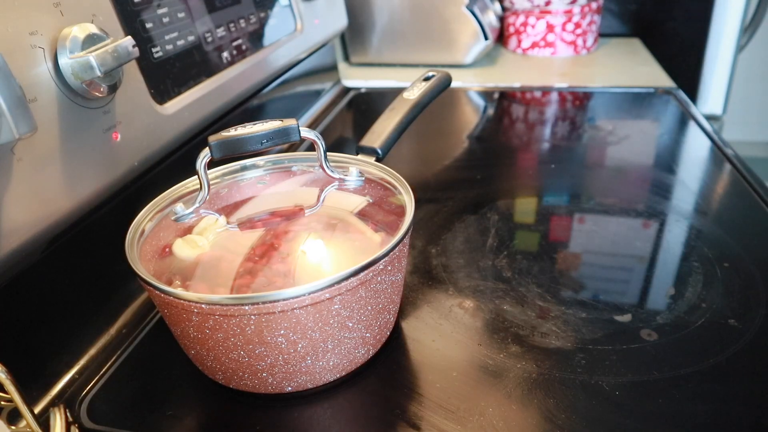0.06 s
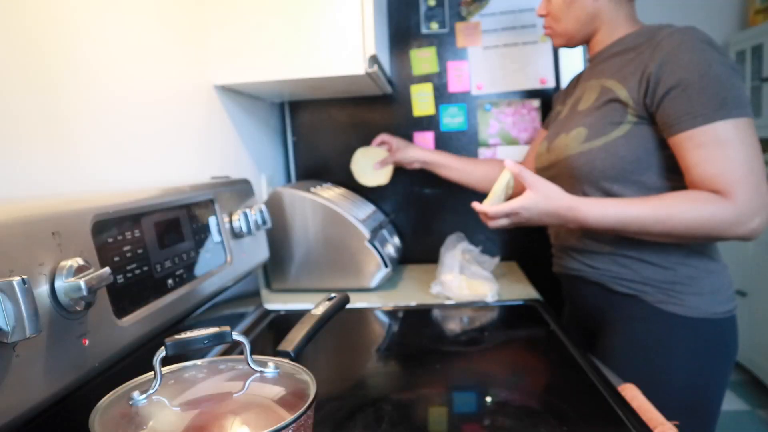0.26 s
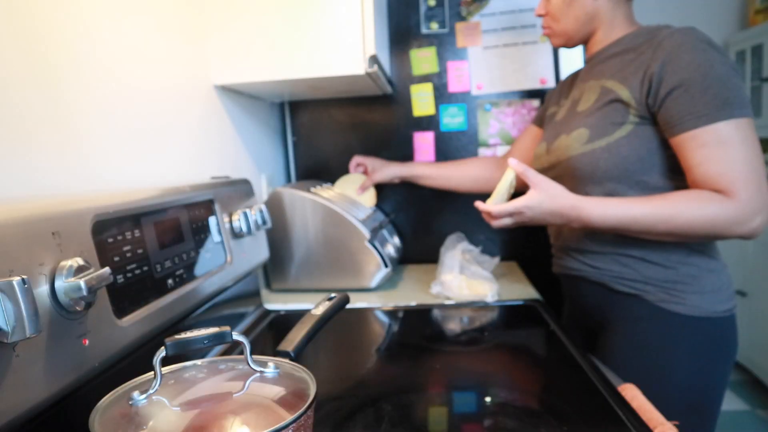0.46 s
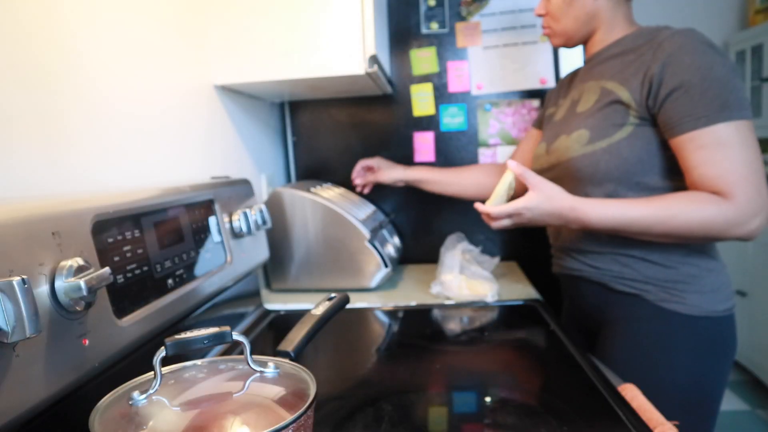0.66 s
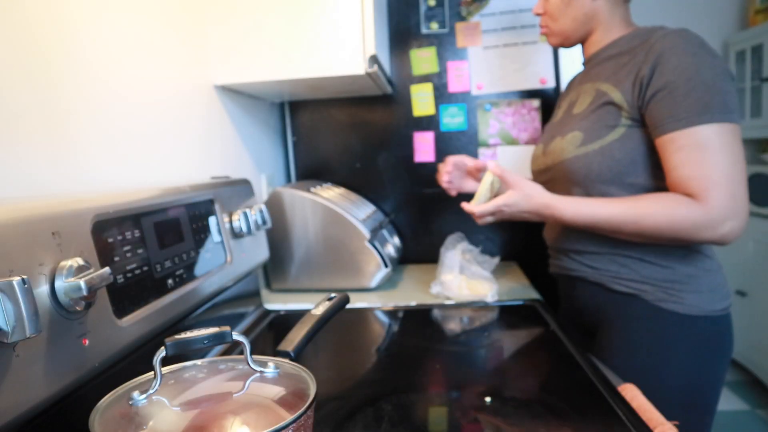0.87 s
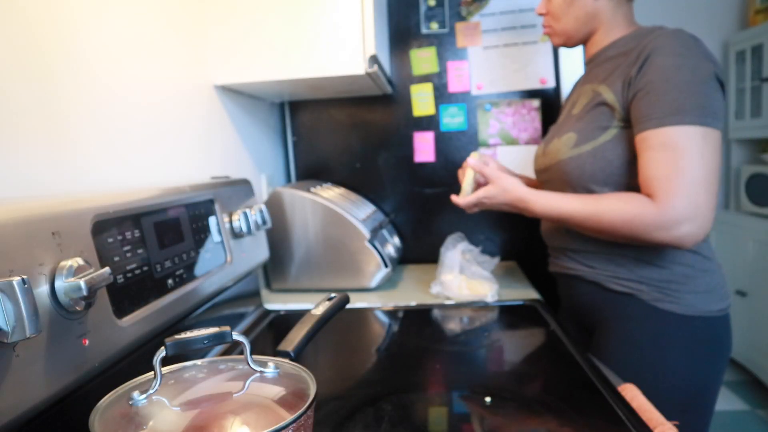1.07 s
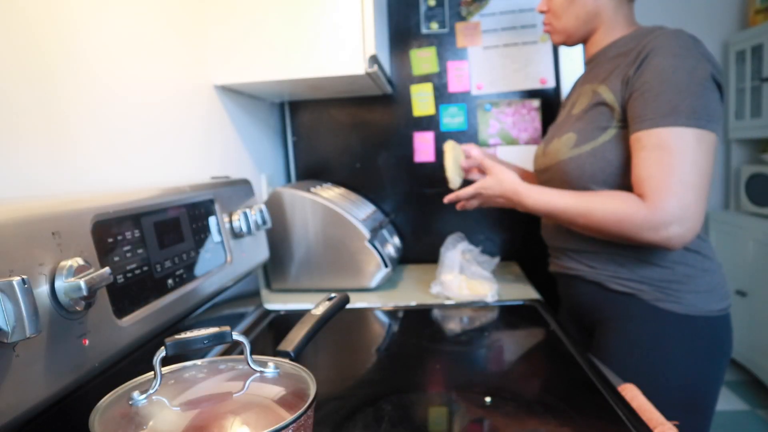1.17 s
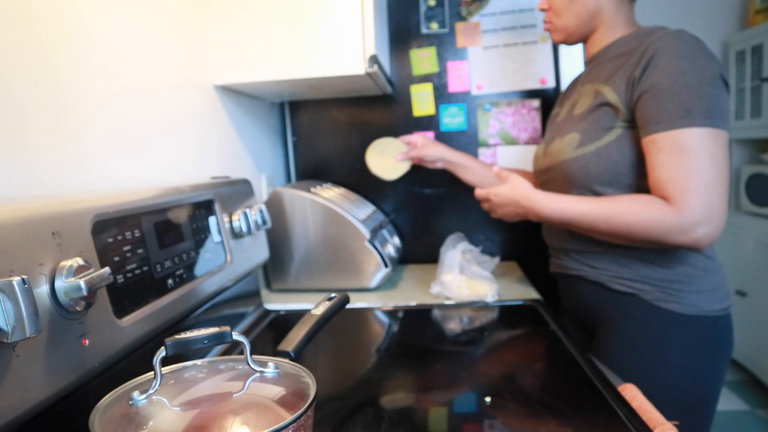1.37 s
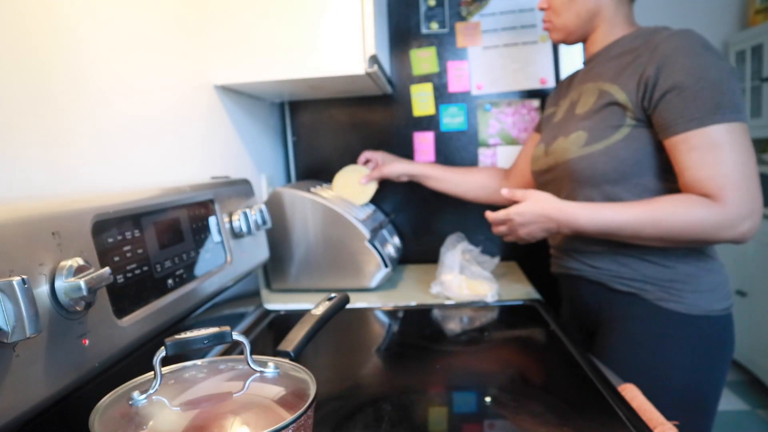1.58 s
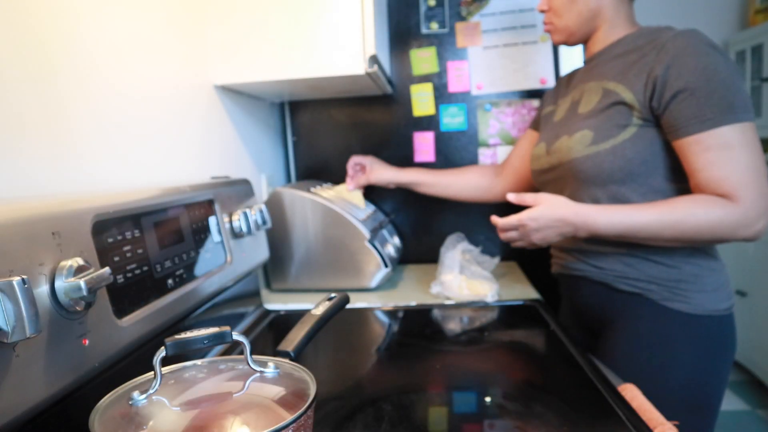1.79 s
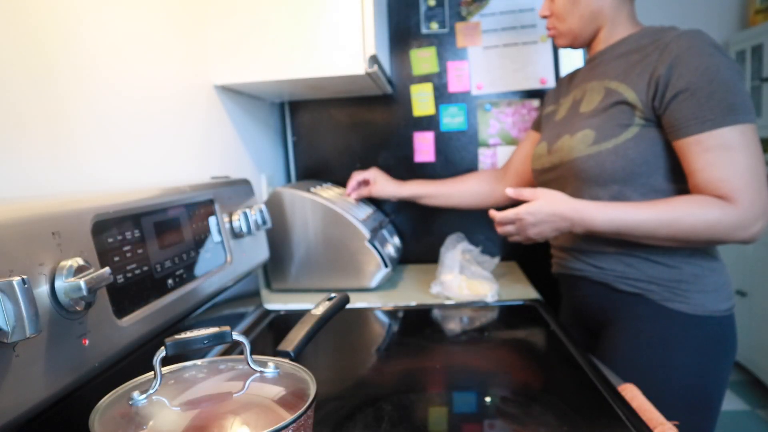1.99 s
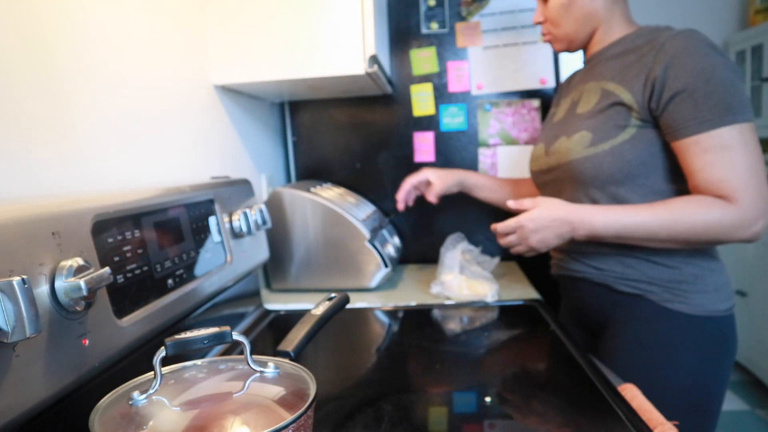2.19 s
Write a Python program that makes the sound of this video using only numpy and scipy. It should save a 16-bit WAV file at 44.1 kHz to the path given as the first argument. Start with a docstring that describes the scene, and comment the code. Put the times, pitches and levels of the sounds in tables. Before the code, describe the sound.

Bread is put into a steel toaster in a quiet kitchen. Silence until 0.16 s, then a steady faint low hum with airy room noise. Tiny pot ticks and a very thin, brief high whine come and go. At 0.6-0.8 s a slice scrapes softly down. Light knocks from 1.78 s lead to a sharp metallic clack at 1.89 s, with thud, short ring and room echo, then small slides until about 2.17 s.

```python
"""A quiet kitchen, heard from the stove after a moment of silence: a steady appliance hum made of
narrow noise bands over broad room noise. A covered pot ticks faintly (short noise bursts) and a thin
whine comes and goes (wavering sine). One piece of bread scrapes down into a steel toaster's slot (grainy
noise). A second knocks in with a sharp clack (noise bursts), rings the shell and wire carriage
(fading sines), then slides and settles. Hard walls answer with a fading noise echo."""
import sys
import numpy as np
from scipy import signal
from scipy.fft import rfft, irfft, next_fast_len
from scipy.io import wavfile

SR = 44100
rng = np.random.default_rng(int(sys.argv[2]) if len(sys.argv) > 2 else 0)


def master_out(mix):
    """Clip the mix to full scale and print it as 16-bit PCM to the path in sys.argv[1]."""
    frames = np.transpose(np.atleast_2d(mix))
    ceiling = np.clip(frames, -1, 1)
    pcm = np.round(ceiling * 32767).astype(np.int16)
    wavfile.write(sys.argv[1], SR, pcm)


N = 98916

# how alike left and right are for nearby sounds and their echo:
# (frequency [Hz], likeness [1 same, 0 unrelated, -1 opposite])
NEAR_ALIKE = [(70, 1), (200, 1), (700, 0.98), (1500, 0.89), (2800, 0.86), (4500, 0.18), (8000, -0.26),
              (12000, -0.24)]
CONTACT_ATTACK_S = 0.00053  # time constant of the rise, for knocks and ticks alike


def amp(db):
    """Turn decibels into a gain."""
    return 10 ** (np.asarray(db) / 20)


def unit(x):
    """Scale to an average strength (rms) of 1."""
    return x / np.sqrt(np.mean(x ** 2) + 1e-20)


def along(points, hz):
    """Read a curve of (frequency, value) points, joined up on a logarithmic frequency axis."""
    point_hz, values = np.transpose(points)
    return np.interp(np.log(hz + 1), np.log(point_hz + 1), values)


def resonance(f, hz, width):
    """A peak of height 1 at hz; it is half as high at half the width to either side."""
    return 1 / (1 + (2 * (f - hz) / width) ** 2)


def filtered(x, response):
    """Multiply the spectrum of x by a gain that depends on frequency."""
    padded = next_fast_len(N + SR // 2)  # spare room so the end does not wrap onto the start
    spectrum = rfft(x, padded) * response(np.fft.rfftfreq(padded, 1 / SR))
    return irfft(spectrum, padded)[..., :N]


def spread(pair, alike):
    """Mix two unrelated signals into a left and right of a given likeness at each frequency."""
    def mid_side_gains(hz):
        angle = np.arccos(np.clip(along(alike, hz), -1, 1)) / 2
        return np.array([np.cos(angle), np.sin(angle)])

    mid, side = filtered(pair, mid_side_gains)
    return np.array([mid + side, mid - side])


def noise(spectrum, alike):
    """Stereo noise of rms 1 whose tone colour follows a spectrum curve."""
    coloured = filtered(rng.standard_normal((2, N)), lambda hz: amp(along(spectrum, hz)))
    return unit(spread(coloured, alike))


def struck(s, attack, t60):
    """Loudness shape of a blow at time s: a quick rise, then a fall of 60 dB per t60 seconds."""
    t = np.maximum(np.arange(N) / SR - s, 0)
    return (1 - np.exp(-t / attack)) * np.exp(-np.log(1000) * t / t60)


def stroke(s, length):
    """Loudness shape of a longer sound: a quick rise, a hold, then a soft release."""
    attack_s, release_s = 0.0047, 0.0056  # time constants
    t = np.maximum(np.arange(N) / SR - s, 0)
    return (1 - np.exp(-t / attack_s)) * np.exp(-np.maximum(t - length, 0) / release_s)


def hum():
    """Narrow noise bands make slightly unsteady appliance tones over broad room noise."""
    # appliance tones: (frequency [Hz], width [Hz], level before the drift [dB])
    hum_tones = [(92.76, 4.9, -58.5), (118.6, 4.3, -66.5), (238, 18.7, -57.5), (278.9, 3.36, -58),
                 (508.4, 12.6, -66.5), (582.5, 22, -67.5), (713, 15, -68), (959, 4, -73), (1282, 13, -74),
                 (1528, 6.9, -78), (2034, 22, -76), (2676, 24, -80.5), (3316, 18, -84.5), (3430, 33, -83.5),
                 (5990, 45, -87)]
    # colour of the room noise: (frequency [Hz], relative level [dB])
    air = [(25, -28), (42, -13), (65, -5), (100, -7), (135, -8.5), (172, -12), (220, -2.5), (265, -5.5),
           (330, -11.5), (400, -15), (520, -13), (760, -15), (1050, -19), (1450, -19), (1800, -24),
           (3000, -29), (6000, -34), (8500, -40), (11500, -44.5), (13000, -51), (15000, -64)]
    # left-right likeness of the room noise: (frequency [Hz], likeness [-1 to 1])
    air_alike = [(60, 1), (180, 0.98), (540, 0.8), (1640, 0.38), (4930, -0.44), (14800, -0.61)]
    # slow drift of tones and room noise together: (time [s], level [dB])
    air_level = [(.16, 0), (.55, 0), (.95, 1), (1.14, 1), (1.22, -1), (1.45, 0.5), (1.7, 1), (2.24, 0.5)]
    air_db = -52  # before the drift

    tones = 0
    for hz, width, db in hum_tones:
        band = filtered(rng.standard_normal(N), lambda f: resonance(f, hz, width))
        tones = tones + amp(db) * unit(band)
    drift_db = np.interp(np.arange(N) / SR, *np.transpose(air_level))
    return amp(drift_db) * (tones + amp(air_db) * noise(air, air_alike))


def ticks():
    """The hot pot gives tiny ticks: a bright snap with more or less body, and a single duller one."""
    # ticks: (time [s], snap level [dB], body level [dB])
    tick_list = [(.256, -53.5, -72), (.347, -58, -62), (.837, -53.5, -68), (0.843, -52, -69),
                 (0.912, -55, -70), (1.003, -56, -68), (1.03, -62, -74), (1.107, -63, -77),
                 (1.29, -53.5, -57), (1.2949, -57, -55), (1.451, -54, -52), (1.603, -60.5, -76)]
    # colour of the snap: (frequency [Hz], relative level [dB])
    snap_colour = [(100, -23), (1200, -1), (3500, -6), (6500, -2.5), (9500, 0), (12000, -1.5), (15000, -24)]
    # colour of the body: (frequency [Hz], relative level [dB])
    body_colour = [(100, -30), (1200, -10), (2200, 3), (3500, -2), (4600, 0.5), (6000, -5), (9000, -28),
                   (15000, -45)]
    # colour of the one duller, narrow tick: (frequency [Hz], relative level [dB])
    tink_colour = [(100, -30), (500, -14), (800, -5), (1100, -12), (1600, -17), (2350, -7), (2650, -9),
                   (2900, 0), (3200, 1), (3500, -14), (5000, -25), (7000, -35), (11000, -60)]
    snap_t60_s, body_t60_s = 0.023, 0.039
    tink_s, tink_db, tink_attack_s, tink_t60_s = 1.373, -43.5, 0.0038, 0.059

    snap_shape = sum(amp(db) * struck(s, CONTACT_ATTACK_S, snap_t60_s) for s, db, _ in tick_list)
    body_shape = sum(amp(db) * struck(s, CONTACT_ATTACK_S, body_t60_s) for s, _, db in tick_list)
    snap = snap_shape * noise(snap_colour, NEAR_ALIKE)
    body = body_shape * noise(body_colour, NEAR_ALIKE)
    tink_shape = amp(tink_db) * struck(tink_s, tink_attack_s, tink_t60_s)
    return snap + body + tink_shape * noise(tink_colour, NEAR_ALIKE)


def whine():
    """A thin sine tone that comes and goes, its phase wandering at random."""
    # whines: (start [s], length [s], level [dB])
    whine_list = [(0.355, 0.045, -73), (0.45, 0.125, -71.5), (0.92, 0.045, -69.5)]
    whine_hz, wavers_per_s = 2042, 25

    t = np.arange(N) / SR
    waver = np.interp(t * wavers_per_s, np.arange(N), rng.standard_normal(N))
    loudness = sum(amp(db) * stroke(s, length) for s, length, db in whine_list)
    tone = np.sqrt(2) * np.sin(2 * np.pi * whine_hz * t + waver)  # rms 1
    return loudness * tone


def scrapes():
    """Crust rubs along the slot: each slip rasps, stirs the hollow body and weakens as it goes."""
    # rubs: (start [s], length [s], rasp level [dB], hollow body level [dB])
    scrape_list = [(0.592, 0.031, -54, -56), (0.624, 0.044, -50, -46.5), (0.683, 0.03, -47, -43),
                   (0.721, .022, -43, -41), (.745, 0.015, -52, -50.5), (0.772, 0.018, -56, -64),
                   (1.814, 0.016, -64, -48), (1.831, 0.046, -61, -64), (1.939, 0.036, -59, -63),
                   (1.965, 0.03, -51, -51.5), (2.074, 0.041, -57, -58), (2.152, .02, -71, -57)]
    # colour of the rasp: (frequency [Hz], relative level [dB])
    crust = [(100, -27), (600, -17), (1100, -4), (1700, -0.5), (2400, -2), (3800, -3.5), (5500, -9),
             (7200, -14.5), (9000, -7), (12000, -13.5), (15000, -38)]
    # colour of the hollow body: (frequency [Hz], relative level [dB])
    hollow = [(30, -6), (135, 6.5), (180, 0.5), (235, 6.5), (330, -4), (560, 3), (750, -7), (1100, -18.5),
              (3000, -35)]
    grains_per_s, grain_db = 700, 3.2  # random level points, and how far they typically stray
    sag_db_per_s = 90  # a rub bites hardest at its start

    t = np.arange(N) / SR

    def rub(s, length):
        return stroke(s, length) * amp(-sag_db_per_s * np.clip(t - s, 0, length))

    rasp_shape = sum(amp(db) * rub(s, length) for s, length, db, _ in scrape_list)
    body_shape = sum(amp(db) * rub(s, length) for s, length, _, db in scrape_list)
    grain = np.interp(t * grains_per_s, np.arange(N), rng.standard_normal(N))
    rasp = unit(amp(grain_db * grain)) * rasp_shape * noise(crust, NEAR_ALIKE)
    return rasp + body_shape * noise(hollow, NEAR_ALIKE)


def contacts():
    """Hard knocks rattle the wire guides, with a bright edge and one singing wire on top."""
    # knocks: (time [s], clatter level [dB], bright edge level [dB])
    contact_list = [(1.78, -50, -53), (1.8077, -48.5, -70), (1.82, -49.5, -72), (1.836, -57, -47),
                    (1.843, -47, -50.5), (1.872, -53, -65), (1.8882, -34.5, -35.5), (1.895, -36, -35.5),
                    (1.901, -36, -42), (1.911, -37.5, -58), (1.9175, -40.5, -52), (1.941, -44.5, -47),
                    (1.976, -64, -45), (1.985, -56, -46), (2.076, -50, -55), (2.083, -56, -60),
                    (2.165, -54, -80)]
    # colour of the clatter: (frequency [Hz], relative level [dB])
    clatter_colour = [(100, -4), (700, 0.5), (1500, 2), (2700, -1.5), (4200, -2), (5500, -19), (7000, -14),
                      (15000, -40)]
    # colour of the bright edge: (frequency [Hz], relative level [dB])
    edge_colour = [(100, -58), (2500, -7), (5000, -3), (7000, -7), (8800, -3), (11000, -8), (13000, -15.5),
                   (15000, -24)]
    clatter_t60_s, edge_t60_s = 0.066, 0.071
    wire_hz, wire_width_hz, wire_t60_s = 4440, 310, 0.064
    # a thin wire sings even at a light touch: it grows only 0.42 dB for each dB of edge
    wire_db, wire_grows = -57.5, 0.42

    clatter, edge, plucks = 0, 0, 0
    usual_db = np.mean([edge_db for _, _, edge_db in contact_list])
    for s, clatter_db, edge_db in contact_list:
        clatter_shape = amp(clatter_db) * struck(s, CONTACT_ATTACK_S, clatter_t60_s)
        edge_shape = amp(edge_db) * struck(s, CONTACT_ATTACK_S, edge_t60_s)
        clatter = clatter + clatter_shape * noise(clatter_colour, NEAR_ALIKE)
        edge = edge + edge_shape * noise(edge_colour, NEAR_ALIKE)
        pluck_db = wire_db + wire_grows * (edge_db - usual_db)
        plucks = plucks + amp(pluck_db) * struck(s, CONTACT_ATTACK_S, wire_t60_s)
    wire = filtered(noise(edge_colour, NEAR_ALIKE), lambda f: resonance(f, wire_hz, wire_width_hz))
    return clatter + edge + plucks * unit(wire)


def guides(x):
    """The wire guides resonate, lifting their own narrow bands in every rub and knock."""
    # resonances of the guides: (frequency [Hz], width [Hz], boost before the trim [dB])
    guide_bands = [(2210, 110, 5), (2690, 260, 5.5), (3200, 80, 5), (3480, 100, 4), (4320, 69, 3.5),
                   (7950, 100, 5.5), (8500, 61, 6), (11400, 92, 0)]
    trim_db = 2.5  # taken off at all frequencies

    def gain(f):
        lift_db = sum(db * resonance(f, hz, width) for hz, width, db in guide_bands)
        return amp(lift_db - trim_db)

    return filtered(x, gain)


LANDING_S = 1.896  # the bread lands on the carriage


def thud():
    """The carriage takes the soft weight of the bread: one fading burst of low noise."""
    # colour of the thud: (frequency [Hz], relative level [dB])
    thud_colour = [(30, -16), (120, -13.5), (220, 0), (310, -14), (400, -8), (570, 9), (680, 0), (900, -4),
                   (1300, -7), (2000, -19), (4000, -43)]
    thud_db, attack_s, t60_s = -39, 0.0012, 0.19
    return amp(thud_db) * struck(LANDING_S, attack_s, t60_s) * noise(thud_colour, NEAR_ALIKE)


def ring():
    """The steel shell and carriage ring after the landing: a sum of fading sines."""
    # ringing tones: (frequency [Hz], relative level before random variation [dB], t60 [s])
    modes = [(122, -13, .4), (211, 1, .27), (380, -7.5, .32), (520, -8, .13), (549, -8, .3), (585, 4, .17),
             (701, -11.5, .17), (1091, -12, .45), (1160, -7, .17), (1305, -10, .17), (1402, -9, .2),
             (1681, -5, .16), (1728, -10, .22), (1770, -11, .14), (2080, -13, .15), (2480, -13, .13),
             (2690, -13, .13), (2792, -20, .55), (3108, -12, .22), (3510, -14, .1)]
    ring_db, attack_s = -34.5, 0.0014

    t = np.arange(N) / SR - LANDING_S
    tones = 0
    for hz, db, t60 in modes:
        level = amp(db + rng.normal(0, 1))
        sine = np.sin(2 * np.pi * (hz * t + rng.random()))  # random starting phase
        tones = tones + level * struck(LANDING_S, attack_s, t60) * sine
    return amp(ring_db) * tones


def kitchen(x):
    """The hard walls answer with a noise tail in which each frequency dies at its own speed."""
    # echo fading time: (frequency [Hz], t60 [s])
    room = [(150, 0.53), (700, 0.35), (2800, 0.49), (8000, 0.45), (14000, 0.11)]
    # echo strength: (frequency [Hz], level [dB])
    room_send = [(100, -2.5), (600, -1), (2500, -2.5), (8000, -1)]

    hz, t, grid = signal.stft(rng.standard_normal((2, SR)), SR, nperseg=256)
    fade = np.exp(-np.log(1000) * t / along(room, hz)[:, None])
    # even out the energy of long and short fades, then set the strength
    energy = SR * np.mean(fade ** 2, axis=1, keepdims=True)
    fade *= amp(along(room_send, hz))[:, None] / np.sqrt(energy)
    tail = signal.istft(grid * fade, SR, nperseg=256)[1]
    echo = signal.fftconvolve(x, tail, axes=1)[:, :N]
    return spread(echo, NEAR_ALIKE)


def scene():
    """Toaster and pot with the walls' echo, over the hum and whine."""
    ring_send_db = -12  # the ring's own fades already include the room, so little echo is added
    pan_db = -0.3  # left minus right

    shell = ring()
    near = thud() + guides(contacts() + scrapes()) + ticks()
    heard = near + shell + kitchen(near + amp(ring_send_db) * shell)
    balance = amp(np.array([[pan_db], [-pan_db]]) / 2)
    return heard * balance + hum() + whine()


def record(dry):
    """Sound begins after a moment of silence; the treble rolls off up to a sharp upper limit."""
    # treble roll-off: (frequency [Hz], level [dB])
    mic = [(11500, 0), (12800, -1.5), (14000, -2), (15200, -7)]
    start_s, top_hz = .16, 15200

    started = dry * (np.arange(N) / SR >= start_s)
    return filtered(started, lambda hz: amp(along(mic, hz)) * (hz < top_hz))


dry = scene()
out = record(dry)
master_out(out)
```